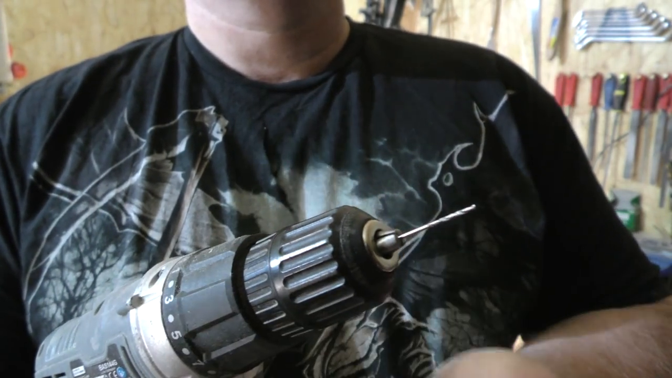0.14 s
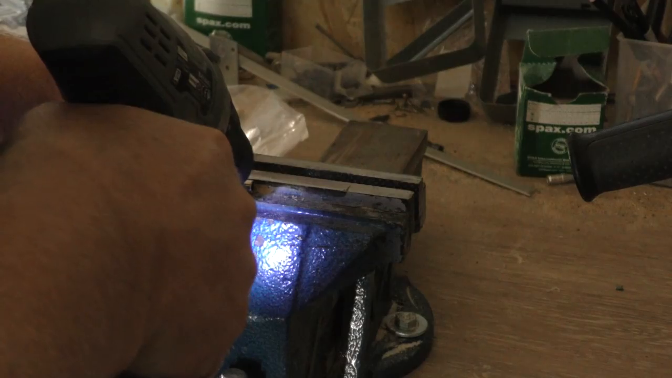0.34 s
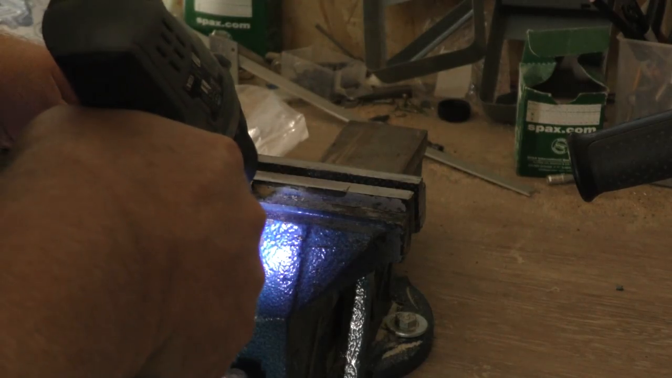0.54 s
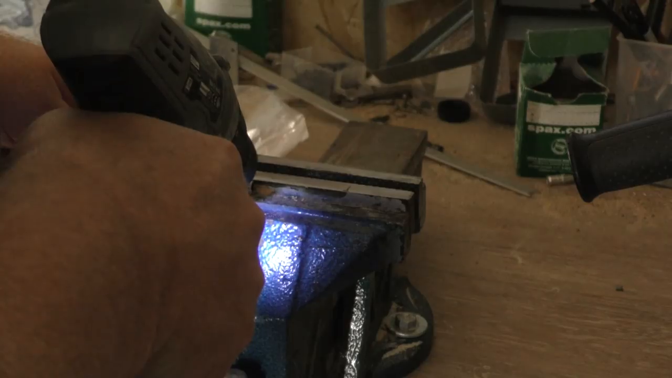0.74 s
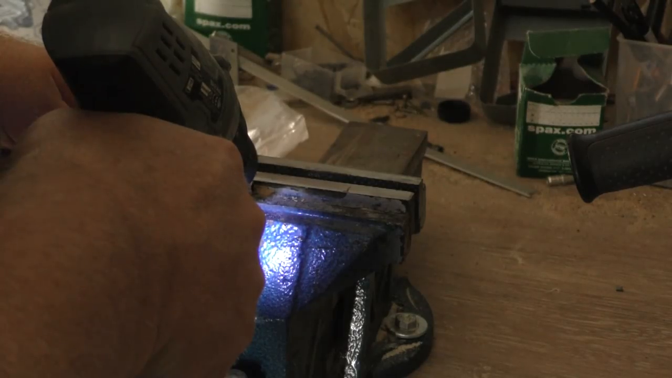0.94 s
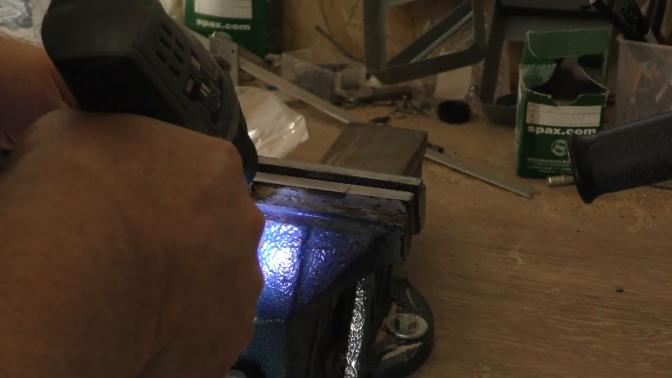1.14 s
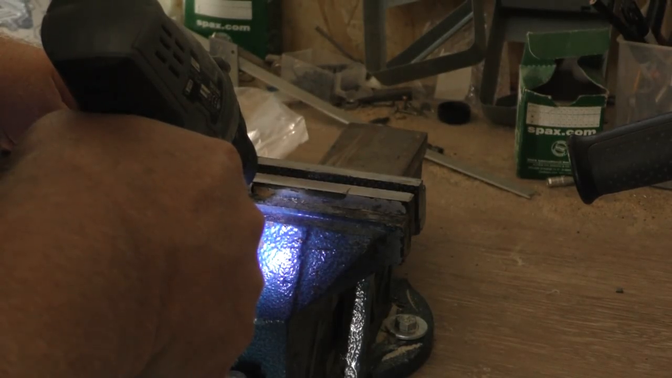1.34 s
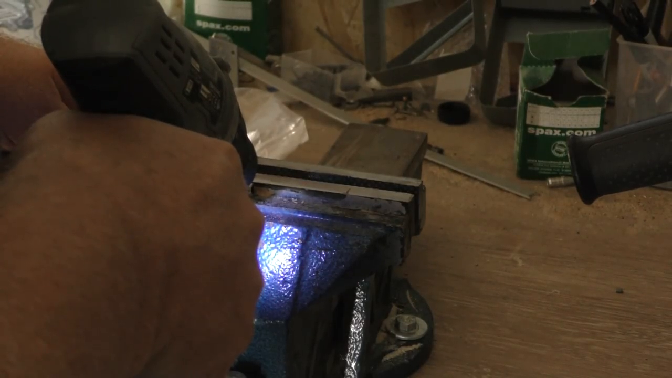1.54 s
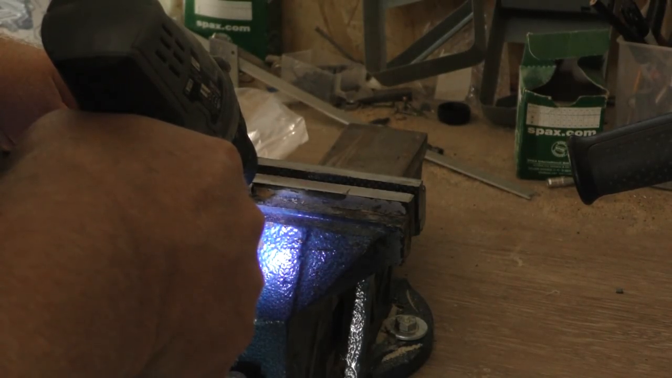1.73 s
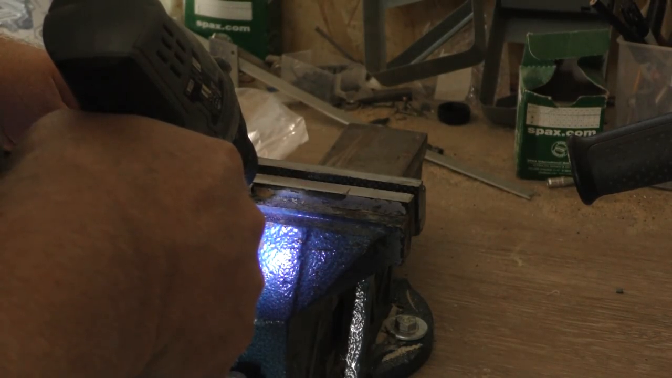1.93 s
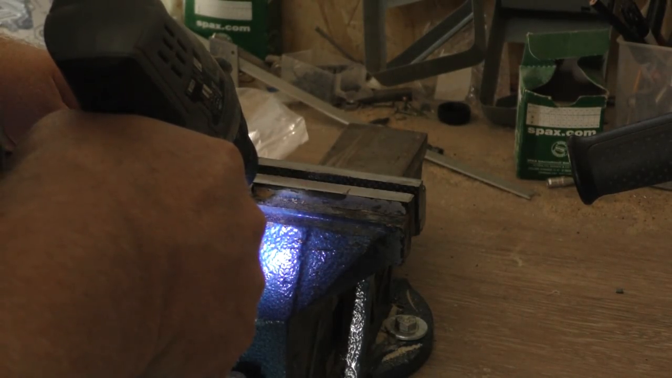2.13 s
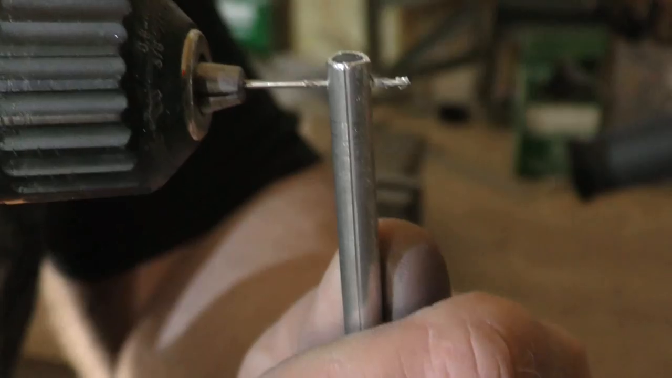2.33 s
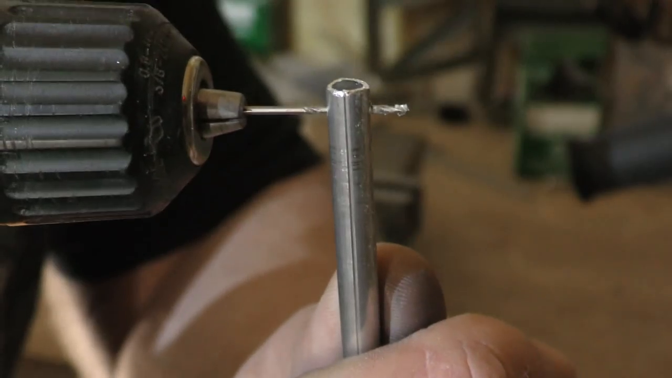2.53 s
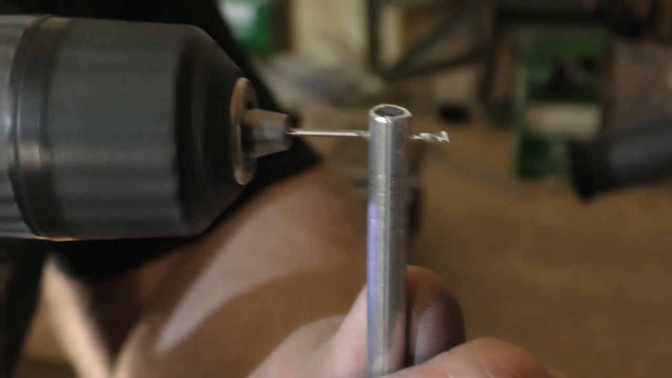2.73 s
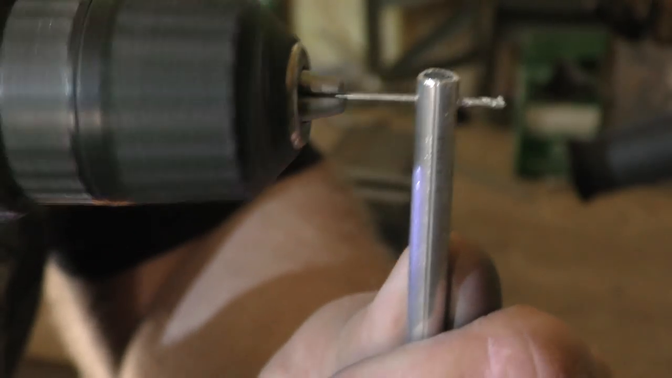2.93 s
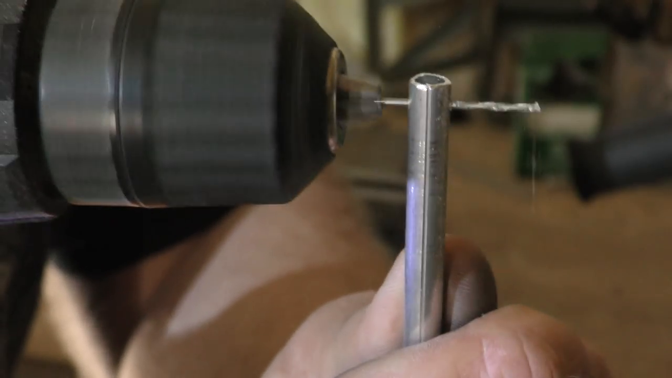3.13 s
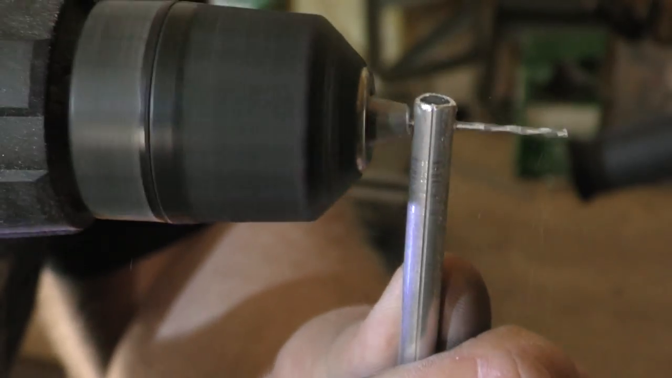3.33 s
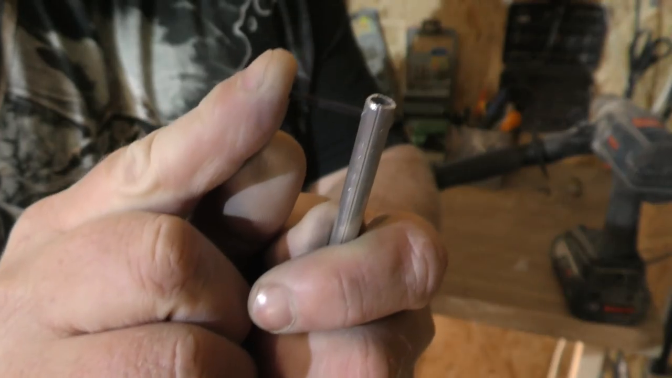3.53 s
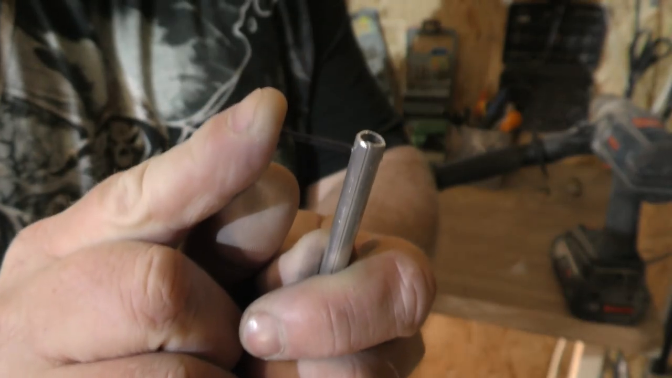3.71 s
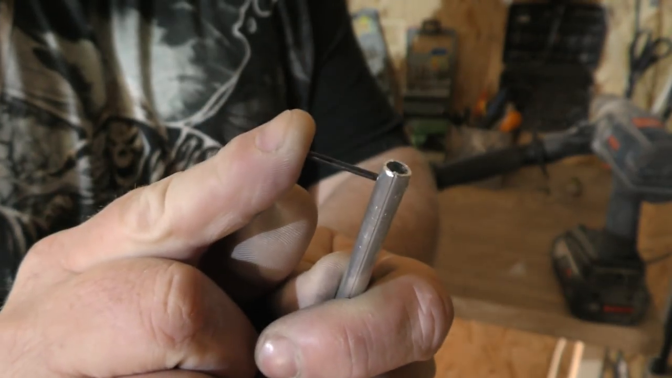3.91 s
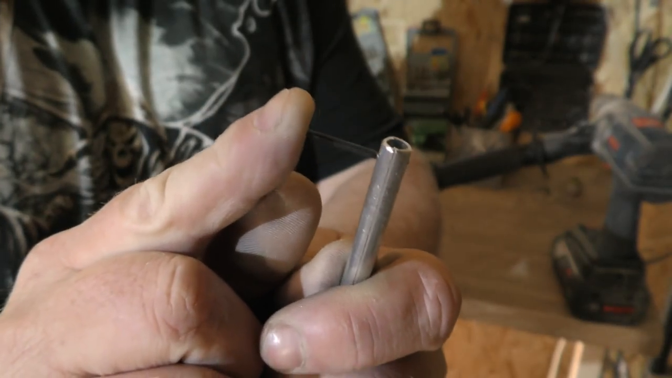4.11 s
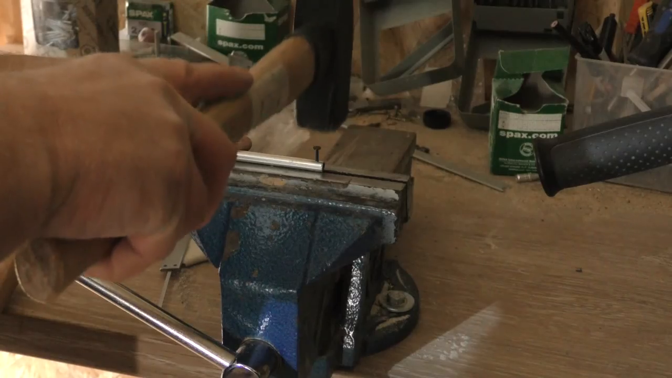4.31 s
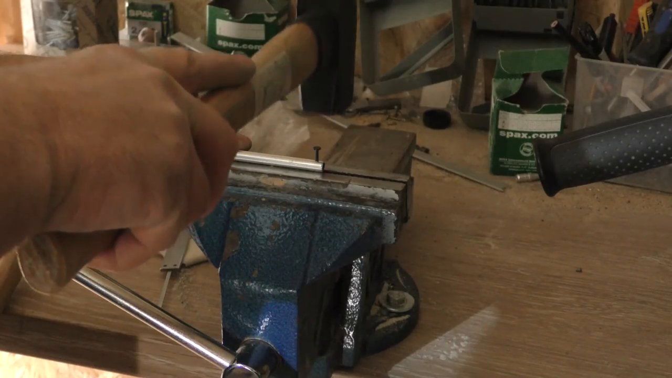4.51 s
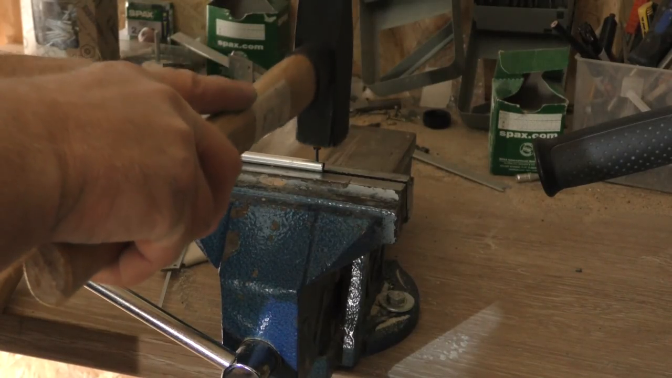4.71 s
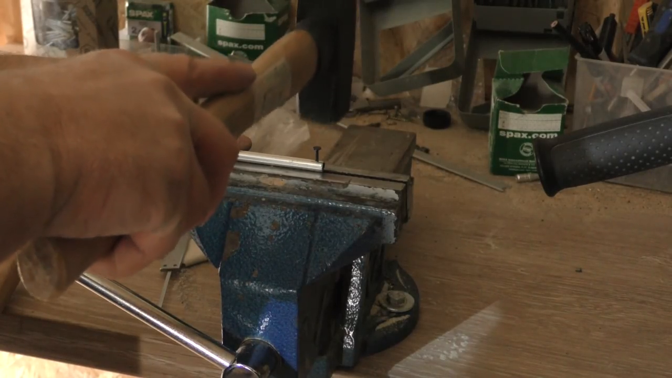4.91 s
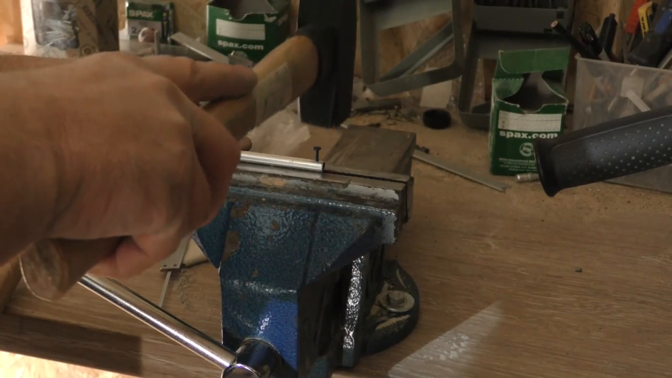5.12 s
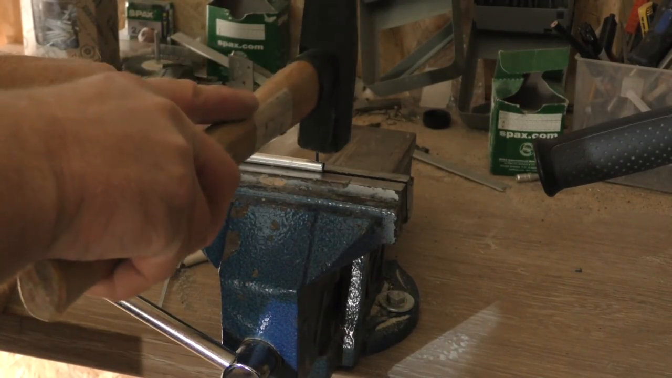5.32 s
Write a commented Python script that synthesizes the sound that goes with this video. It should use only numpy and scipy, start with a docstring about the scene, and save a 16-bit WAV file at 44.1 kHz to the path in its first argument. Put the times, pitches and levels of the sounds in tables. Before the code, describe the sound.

Two short runs of a cordless drill, one steady and one rising in pitch, then close hammer blows on a pin in a vice.

```python
"""A cordless drill close to a stereo pair of microphones in a workshop, in short scenes with hard cuts.
It runs steadily in a metal tube, then runs up in the hand, left of centre: gear teeth rattle through the
housing while motor and gears sing at multiples of the shaft rate. Last, also close, a hammer strikes a pin
in a tube held by a vice, and tube, vice and bench ring. Faint, wide room tone fills the gaps."""
import sys
import numpy as np
from scipy import signal
from scipy.fft import rfft, irfft, next_fast_len
from scipy.io import wavfile

SR = 44100
rng = np.random.default_rng(int(sys.argv[2]) if len(sys.argv) > 2 else 0)


def unload_audio(sound):
    """Save the sound as a 16-bit wav file, at the path given as the first command line argument."""
    columns = np.transpose(np.atleast_2d(sound))
    # keep every value between -1 and 1, then stretch to whole-number steps
    steps = np.round(np.clip(columns, -1, 1) * 32767)
    wavfile.write(sys.argv[1], SR, steps.astype(np.int16))


N = 236331
TIME = np.arange(N) / SR
FFT_SIZE = next_fast_len(N + SR // 2)
BIN_HZ = np.maximum(np.arange(FFT_SIZE // 2 + 1) * SR / FFT_SIZE, 1)

# room tone by scene: (start [s], first hiss [dB], settled hiss [dB], settling time [s], rumble [dB])
ROOM_LEVELS = [(0, -58, -67, .08, -70), (.390, -74, -74, 1, -88), (2.411, -79, -79, 1, -94),
               (2.66, -74, -74, 1, -84), (3.461, -63, -68.5, .35, -69)]
# spectra of the room's hiss and rumble: (frequency [Hz], relative level [dB])
HISS_COLOUR = [(29, -32), (50, -16.5), (125, -20.5), (147, -11), (177, -18), (246, -11), (276, -19),
               (304, -9), (384, -16.5), (421, -7), (571, -11), (1080, -18), (2120, -19.5), (2750, -25),
               (13500, -33)]
RUMBLE_COLOUR = [(8, -3), (18, -6), (40, -7), (70, -17), (120, -47)]
# hum in the room: (frequency [Hz], level against the hiss [dB])
HUM_LINES = [(277, -12), (346, -11.5), (553, -15), (1949, -19.5), (7957, -22)]
# thin whistles: (start [s], end [s], first pitch [Hz], last pitch [Hz], level [dB])
WHISTLES = [(3.54, 3.62, 4690, 4670, -81), (4.31, 4.40, 10600, 10300, -84), (4.645, 4.71, 9800, 8950, -85)]

# hammer blows: (time [s], strength [dB], hardness [dB], thud of the bench [dB], clank of the vice [dB])
BLOWS = [(4.293, -32.5, -8, -1.5, -7), (4.422, -12, 0.5, 2.5, -3.5), (4.747, -10.5, -5.5, -8, -2),
         (5.045, -12, -1, 0, 5), (5.327, -14.5, 1, 1.5, 2)]
# modes of vice, tube and bench: (frequency [Hz])
MODE_HZ = [93, 202, 314, 345, 378, 424, 483, 512, 576, 775, 900, 1045, 1085, 1260, 1300, 1402, 1475, 1499,
           1913, 2126, 2191, 2293, 2340, 2710]
# ringing of each mode: (relative level [dB], t60 [s])
MODE_RING = [(-19.5, 0.26), (-14.5, 0.32), (-6.5, 0.045), (-10, 0.26), (-3.5, 0.19), (-5.5, .4), (-40, 0.2),
             (-9, 0.28), (-23, 0.26), (-10.5, 0.081), (-9, 0.078), (-21, 0.12), (-35, 0.087), (-18, 0.081),
             (-16.5, 0.24), (-20, 0.58), (-7, 0.074), (1, 0.042), (-21, 0.58), (-43, 0.3), (-36, 0.14),
             (-20, 0.15), (-20, 0.17), (-14.5, 0.11)]
# spectrum of a blow's noisy tail: (frequency [Hz], relative level [dB])
TAIL_COLOUR = [(60, -12), (95, -11), (130, -15.5), (200, -9.5), (270, -13.5), (430, 0), (700, -13),
               (1100, -13), (1420, -19.5), (1720, -15.5), (2250, -11.5), (2900, -26), (5000, -25.5),
               (8000, -28), (13500, -47.5)]
# decay of that tail: (frequency [Hz], t60 [s])
TAIL_T60 = [(60, 0.45), (160, 0.49), (420, 0.46), (1100, 0.48), (2910, 0.48), (7680, 0.3)]
# metal resonances driven by the tail: (frequency [Hz], gain [dB], t60 [s])
TAIL_RINGS = [(1490, 3, 0.015), (2372, 4, 0.03), (5330, -4.5, 0.0024)]
THUD_BELOW_HZ, CLANK_HZ, CLANK_WIDTH_HZ = 260, 1450, 350

# the two drill scenes, by name: (cut in [s], cut out [s])
CUTS = dict(steady=(.390, 2.411), runup=(2.6, 3.461))
# trigger and gears taking up: (time [s], level [dB], ring [Hz])
TRIGGER_CLICKS = [(2.602, -64, 6000), (2.616, -44, 1300), (2.640, -49, 1500), (2.655, -43, 5200)]
# whine of the motor current, stepping with the trigger: (start [s], pitch [Hz], level [dB])
WHINE_STEPS = [(2.616, 3750, -59), (2.640, 3570, -58), (2.657, 3480, -56), (2.74, 3520, -51)]
# its harmonics from the first: (relative level [dB])
WHINE_HARMONICS_DB = [0, -7, -17]
# run-up under load, then the bit comes free and races: (time [s], shaft rate [Hz], gear noise [dB])
RUNUP_SPEED = [(2.63, 104.6, -55), (2.67, 114.3, -48), (2.73, 129, -40), (2.81, 151.5, -36),
               (2.87, 161, -36.5), (2.98, 173, -35.5), (3.16, 182, -36.5), (3.36, 188.5, -35.5),
               (3.368, 210, -32.5), (3.406, 245.2, -33), (3.46, 276, -32.5)]
# gear mesh in the run-up: (order [x shaft rate], peak level [dB], housing resonance [Hz], width [Hz])
MESH_ORDERS = [(27, -43, 4950, 520), (33, -44.5, 5160, 360), (42, -52, 7800, 250), (6, -52, 1070, 80),
               (2, -58, 370, 60)]
# low tones of the run-up: (order [x shaft rate]), and for each (relative level [dB])
LOW_ORDERS = [3, 4, 5]
LOW_ORDERS_DB = [0, -2.5, -2]
# how the housing radiates them: (frequency [Hz], level against the gear noise [dB])
HOUSING_RESPONSE = [(330, -36), (400, -17.5), (490, -12), (525, -12), (560, -8.5), (650, -9.5), (725, -4.5),
                    (770, -18), (850, -46), (980, -10), (1100, -18)]

# brightest whine in the tube, held back a little by the bit's load: (time [s], pitch [Hz], level [dB])
BRIGHTEST_WHINE = [(.4, 8888, -60), (.86, 8938, -56), (2.0, 8922, -57), (2.4, 8916, -63)]
BRIGHTEST_ORDER = 60
# commutator and gear mesh tones in the tube: (order [x shaft rate]), and for each (level [dB])
STRONG_ORDERS = [3.07, 7, 10.63, 12, 13.1, 15, 17, 18, 20, 24, 25, 30, 38, 84]
STRONG_DB = [-61, -56, -57, -59, -55, -59, -61, -60, -62, -56, -61.5, -59, -57, -74]
# two runs of even orders: (first order [x shaft rate], last order [x shaft rate])
EVEN_RUNS = [(2, 10), (48, 64)]
EVEN_DB, EVEN_FALL_DB = [-44, -51], [1.4, .2]   # of each run: level over STEADY_COLOUR, loss per order
# gear noise spectra, in the hand and in the tube: (frequency [Hz], relative level [dB])
RUNUP_COLOUR = [(35, -80), (60, -43), (121, -38), (182, -32), (245, -29), (293, -35), (368, -12), (726, -7),
                (813, -11), (1920, -8), (3470, -14), (4870, -9.5), (6250, -14.5), (10800, -20.5),
                (13500, -36.5)]
STEADY_COLOUR = [(35, -87), (70, -35), (150, -20), (250, -19), (340, -22.5), (440, -5.5), (700, -6),
                 (1020, -8), (1760, -4.5), (2360, -7), (3600, -9.5), (5200, -7), (7000, -12), (10000, -14),
                 (13500, -25.5)]
# humps and dips of the housing, and of housing and tube: (frequency [Hz], width [Hz], gain [dB])
RUNUP_BODY = [(576, 20, 0.5), (760, 76, 1), (1875, 114, 7.5), (2750, 31, 10.5), (3320, 10, -17),
              (5030, 130, 6), (8000, 150, -4), (9100, 22, -15)]
STEADY_BODY = [(603, 47, 9.5), (1029, 93, 9.5), (1533, 120, 6.5), (1784, 110, 7), (2004, 43, 6.5)]

# width of each source at the microphones: (frequency [Hz], side against mid [dB])
ROOM_WIDTH = [(60, -1), (150, -8), (360, -18), (890, -2.5), (2180, -1.5), (5370, 3), (13200, 1.5)]
BLOW_WIDTH = [(60, -22), (150, -53), (360, -43), (890, -22.5), (2180, -9.5), (5370, -8), (13200, 2)]
RUNUP_WIDTH = [(60, -6), (150, -24), (360, -37), (890, -33), (2180, -11.5), (5370, -8.5), (13200, 8)]
STEADY_WIDTH = [(60, -31), (150, -42.5), (360, -53), (890, -37.5), (2180, -18), (5370, -8), (13200, 3)]
# the hand-held drill stands left of centre: (frequency [Hz], mid fed into side [dB])
RUNUP_LEAN = [(300, -52), (1000, -23), (3000, -14.5), (8000, -15), (13000, 2)]


def amp(db):
    """dB to gain."""
    return 10 ** (np.asarray(db) / 20)


def rms_one(x):
    """Scale to rms 1."""
    return x / np.sqrt(np.mean(x ** 2) + 1e-20)


def in_time(rows):
    """Columns of a table as straight lines between its times, one value per sample."""
    times, *columns = np.transpose(rows)
    return [np.interp(TIME, times, column) for column in columns]


def in_steps(rows):
    """Columns of a table whose rows each hold until the next, one value per sample."""
    rows = np.array(rows, float)
    current = np.searchsorted(rows[:, 0], TIME, "right") - 1
    return rows[np.maximum(current, 0)].T


def at_hz(points, hz):
    """Read a table on a log-frequency axis."""
    frequencies, values = np.transpose(points)
    return np.interp(np.log(hz), np.log(frequencies), values)


def phase_of(hz):
    """Running phase of a pitch curve, in radians."""
    return 2 * np.pi * np.cumsum(hz * np.ones(N)) / SR


def drift(rate):
    """Straight lines between random points of spread 1, `rate` of them a second."""
    count = int(N * rate // SR + 2)
    return np.interp(TIME * rate, np.arange(count), rng.standard_normal(count))


def tone(phase, rough_db, rate):
    """A sine of rms 1 times a random flutter in level."""
    return np.sqrt(2) * np.sin(phase + 2 * np.pi * rng.random()) * amp(rough_db * drift(rate))


def colour(x, spectrum, body=()):
    """Shape a noise by a spectrum and resonance humps."""
    humps_db = sum(db / (1 + (2 * (BIN_HZ - hz) / width) ** 2) for hz, width, db in body)
    return irfft(rfft(x, FFT_SIZE) * amp(at_hz(spectrum, BIN_HZ) + humps_db), FFT_SIZE)[:N]


def filtered(x, hz, kind):
    """A gentle filter of order 2."""
    return signal.sosfilt(signal.butter(2, hz, kind, fs=SR, output="sos"), x)


def ring(x, hz, t60):
    """A resonator: a unit click sets a sine of height 1 ringing."""
    radius, angle = amp(-60 / (t60 * SR)), 2 * np.pi * hz / SR
    return signal.lfilter([0, np.sin(angle)], [1, -2 * radius * np.cos(angle), radius ** 2], x + 1e-18)


def gate(start, end):
    """A hard cut in and out, with 3 ms edges."""
    return np.clip(np.minimum(TIME - start, end - TIME) / 0.003, 0, 1)


def mic_pair(mid, width, spread_s, lean=((20, -90), (20000, -90))):
    """Two closely spaced microphones: the side signal is the mid scattered by near reflections."""
    scatter = rng.standard_normal(SR // 4) * np.exp(-TIME[:SR // 4] / spread_s)
    reflections = rfft(scatter / np.linalg.norm(scatter), FFT_SIZE) * amp(at_hz(width, BIN_HZ))
    off_centre = amp(at_hz(lean, BIN_HZ))
    side = irfft(rfft(mid, FFT_SIZE) * (reflections + off_centre), FFT_SIZE)[:N]
    return np.array([mid + side, mid - side])


def rustle():
    """A soft rustle dying away at the opening."""
    noise = rms_one(filtered(rng.standard_normal(N), (1400, 3180), "band"))
    return amp(-65) * noise * np.exp(-TIME / 0.08)


def whistles():
    """Faint, brief whistles, each sliding down."""
    out = 0
    for start, end, *glide_hz, db in WHISTLES:
        hz = np.interp(TIME, (start, end), glide_hz)
        out += amp(db) * gate(start, end) * tone(phase_of(hz), rough_db=2, rate=30)
    return out


def room_tone():
    """The workshop all around the microphones: hiss, hum, rumble and small noises; over it all, a thin steady
    high tone."""
    start, first_db, settled_db, settling_s, rumble_db = in_steps(ROOM_LEVELS)
    hiss_db = settled_db + (first_db - settled_db) * np.exp((start - TIME) / settling_s)
    hiss = rms_one(colour(rng.standard_normal(N), HISS_COLOUR)) * amp(.7 * drift(8))
    hum = sum(amp(db) * tone(phase_of(hz), rough_db=3, rate=12) for hz, db in HUM_LINES)
    rumble = amp(rumble_db) * rms_one(colour(rng.standard_normal(N), RUMBLE_COLOUR))
    high_tone = amp(-92) * np.sqrt(2) * np.sin(phase_of(11999))
    room = amp(hiss_db) * (hiss + hum) + rumble + rustle() + whistles()
    return mic_pair(room, ROOM_WIDTH, spread_s=0.072) + high_tone


def blow_colour(hz):
    """dB by which each blow favours a pitch: hard ones the treble, heavy ones the bass, some the clank."""
    hard_db, thud_db, clank_db = np.transpose(BLOWS)[2:, :, None]
    treble = hard_db * min(hz, 8000) / 4000
    thud = thud_db / (1 + (hz / THUD_BELOW_HZ) ** 4)
    clank = clank_db / (1 + (2 * (hz - CLANK_HZ) / CLANK_WIDTH_HZ) ** 2)
    return treble + thud + clank


def struck_modes(t):
    """Vice, tube and bench ring until the head settles back on the pin and muffles them; a row a blow."""
    impact = signal.unit_impulse(len(t), round(0.0034 * SR))
    muffled = amp(-9 * np.clip((t - 0.033) / 0.006, 0, 1))
    modes = 0
    for k, (hz, (db, t60)) in enumerate(zip(MODE_HZ, MODE_RING)):
        strength = amp(db + blow_colour(hz) + rng.normal(0, 1.3, (len(BLOWS), 1)))
        damping = muffled if hz > THUD_BELOW_HZ else 1   # the bench itself rings on
        modes += (-1) ** k * strength * ring(impact, hz, t60) * damping   # neighbours start opposed
    return modes


def crack_and_tail(t):
    """Steel cracks on steel and leaves a noisy tail that dies band by band; a row a blow."""
    shared = 0.89 * rng.standard_normal((2, 1, len(t)))   # the blows are partly alike
    noise = shared + 0.95 * rng.standard_normal((2, len(BLOWS), len(t)))
    edges_hz = 44 * 2 ** np.arange(0, 8.5, 1 / 3)
    tail = 0
    for k, (low, high) in enumerate(zip(edges_hz, edges_hz[1:])):
        hz = np.sqrt(low * high)
        band = filtered(noise[k % 2], [low, high], "band")
        crack = 2.12 * np.exp(-t / 0.0068) * np.minimum(hz / 3000, 1)
        dying = amp(-60 * t / at_hz(TAIL_T60, hz)) * np.minimum(t / 0.0043, 1)
        tail += amp(8.5 + at_hz(TAIL_COLOUR, hz) + blow_colour(hz)) * band * (dying + crack)
    metal = sum(amp(db) * 2 * np.log(1000) / (t60 * SR) * ring(tail, hz, t60)
                for hz, db, t60 in TAIL_RINGS)
    return tail + metal


def hammer():
    """Blows on the pin in the vice, close to the microphones."""
    t = TIME[:SR // 2]
    sounds = struck_modes(t) + crack_and_tail(t)
    out = np.zeros(N + len(t))
    for (at, db, *_), sound in zip(BLOWS, sounds):
        out[round((at - .002) * SR):][:len(t)] += amp(db) * sound
    out = filtered(out[:N], 60, "high")   # the bench radiates little bass
    return mic_pair(out, BLOW_WIDTH, spread_s=0.014)


def trigger_clicks():
    """Trigger and gears take up in short, ringing snaps."""
    clicks, t = np.zeros(N), TIME[:SR // 20]
    for at, db, hz in TRIGGER_CLICKS:
        snap = rng.standard_normal(len(t)) * np.exp(-t / 0.0018)
        clicks[round(at * SR):][:len(t)] += amp(db) * (.6 * snap + .2 * ring(snap, hz, t60=.006))
    return clicks


def current_whine():
    """The switched motor current whines briefly as the drill starts."""
    _, hz, level_db = in_steps(WHINE_STEPS)
    whine = sum(amp(level_db + db) * tone(k * phase_of(hz), rough_db=2, rate=40)
                for k, db in enumerate(WHINE_HARMONICS_DB, 1))
    return whine * gate(WHINE_STEPS[0][0], end=2.8)


def gears(turn, spectrum, body, beat, grit_db):
    """Dense, uneven tooth contacts, swelling once and twice a turn, heard through the housing; rms 1."""
    contacts = rng.standard_normal(N) * amp(grit_db * drift(900))
    swell = 1 + beat * (np.sin(turn) + np.sin(2 * turn))
    return rms_one(colour(contacts * swell, spectrum, body))


def runup_drill():
    """The drill in the hand, close and to the left: tones climb with the shaft as gear noise swells."""
    shaft_hz, noise_db = in_time(RUNUP_SPEED)
    turn = phase_of(shaft_hz)
    unbalance = amp(-67) * (shaft_hz / 185) ** 5.2 * tone(turn, rough_db=0.5, rate=66)
    low = sum(amp(noise_db + db + at_hz(HOUSING_RESPONSE, k * shaft_hz))
              * tone(k * turn, rough_db=4, rate=45) for k, db in zip(LOW_ORDERS, LOW_ORDERS_DB))
    # each mesh tone stands out while it crosses a housing resonance
    mesh = sum(amp(db) * tone(k * turn, rough_db=1, rate=29) / (1 + (2 * (k * shaft_hz - hz) / width) ** 4)
               for k, db, hz, width in MESH_ORDERS)
    noise = amp(noise_db) * gears(turn, RUNUP_COLOUR, RUNUP_BODY, beat=0.085, grit_db=0.5)
    fade_in = np.clip((TIME - 2.63) / 0.06, 0, 1)
    drill = fade_in * (unbalance + low + mesh + noise) + current_whine() + trigger_clicks()
    return mic_pair(drill, RUNUP_WIDTH, spread_s=0.037, lean=RUNUP_LEAN) * gate(*CUTS["runup"])


def steady_drill():
    """The drill in the tube, close: gear noise, and tones wavering together with the load on the bit."""
    brightest_hz, brightest_db = in_time(BRIGHTEST_WHINE)
    shaft_hz = brightest_hz / BRIGHTEST_ORDER
    turn = phase_of(shaft_hz * (1 + 0.00056 * drift(25.04)))
    orders = {BRIGHTEST_ORDER: brightest_db, **dict(zip(STRONG_ORDERS, STRONG_DB))}
    for (first, last), db, fall_db in zip(EVEN_RUNS, EVEN_DB, EVEN_FALL_DB):
        for k in range(first, last + 1, 2):
            orders.setdefault(k, db - fall_db * (k - first) + at_hz(STEADY_COLOUR, k * shaft_hz.mean()))
    tones = sum(amp(db + 2.2 * drift(4.27)) * tone(k * turn, rough_db=3.5, rate=34)
                for k, db in orders.items())
    noise = amp(-37) * gears(turn, STEADY_COLOUR, STEADY_BODY, beat=0.086, grit_db=1.0)
    unbalance = amp(-71.5) * tone(turn, rough_db=4.5, rate=21)
    return mic_pair(noise + tones + unbalance, STEADY_WIDTH, spread_s=0.0083) * gate(*CUTS["steady"])


def scene():
    """Everything that reaches the microphones."""
    return steady_drill() + runup_drill() + hammer() + room_tone()


def record(dry):
    """The recorder rounds the peaks and cuts steeply above 13650 Hz."""
    rounded = .8 * np.tanh(dry / .8)
    return signal.sosfilt(signal.ellip(10, .5, 60, 13650, fs=SR, output="sos"), rounded)


dry = scene()
out = record(dry)
unload_audio(out)
```